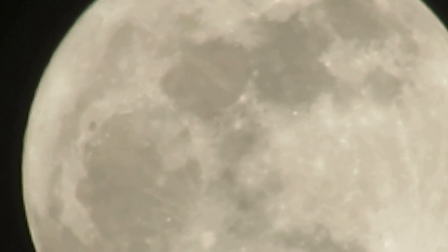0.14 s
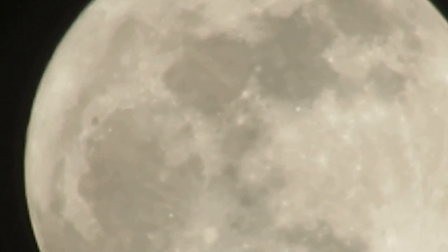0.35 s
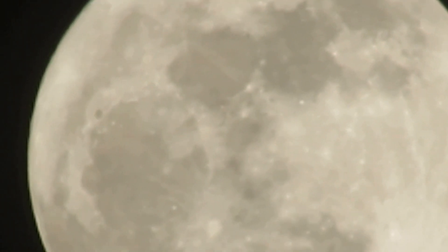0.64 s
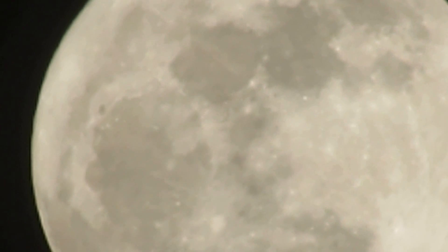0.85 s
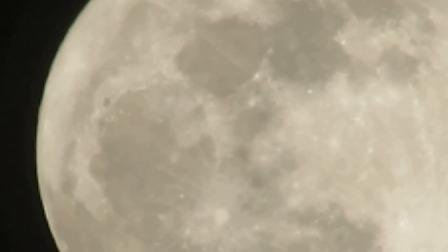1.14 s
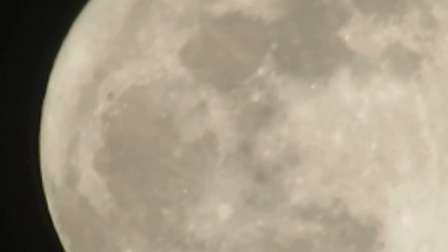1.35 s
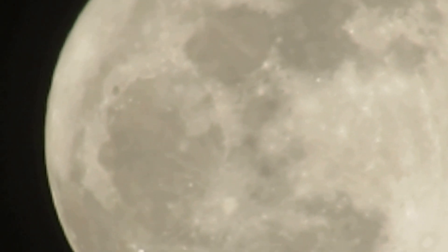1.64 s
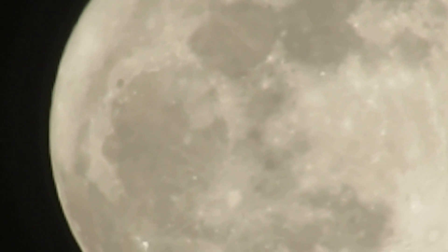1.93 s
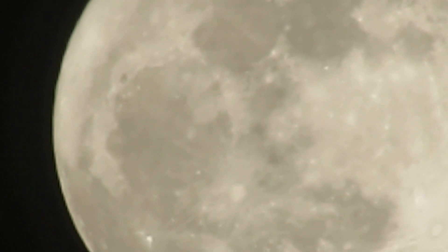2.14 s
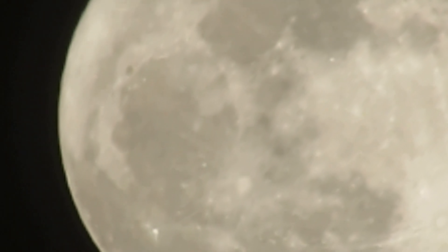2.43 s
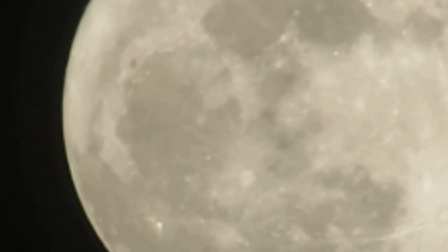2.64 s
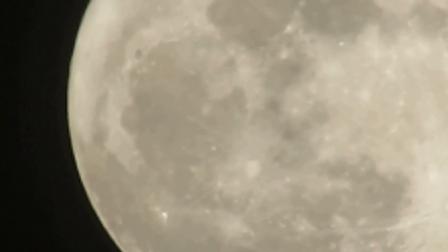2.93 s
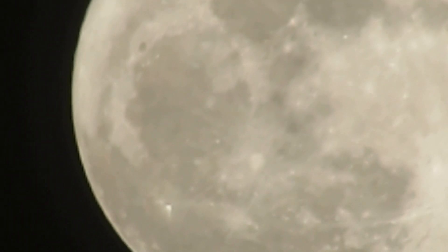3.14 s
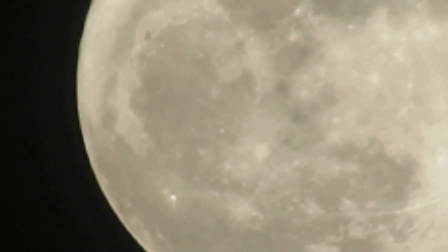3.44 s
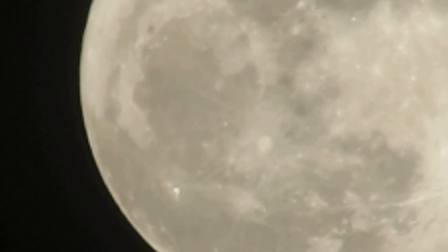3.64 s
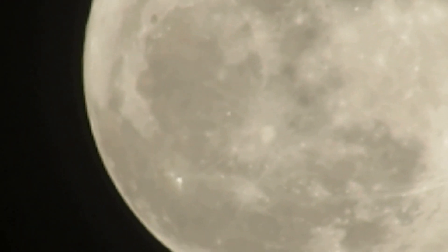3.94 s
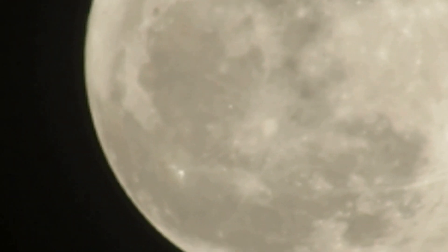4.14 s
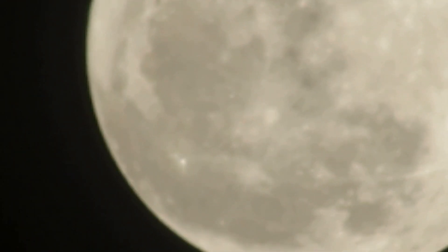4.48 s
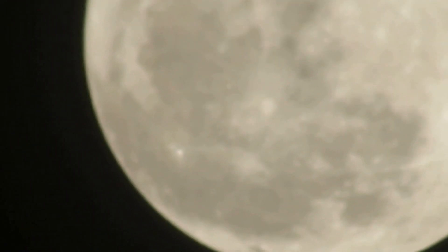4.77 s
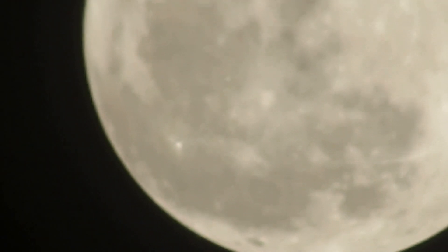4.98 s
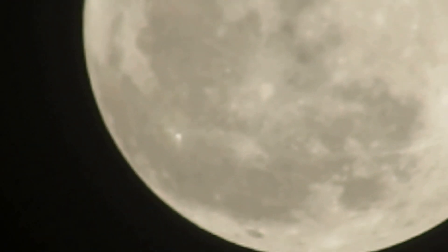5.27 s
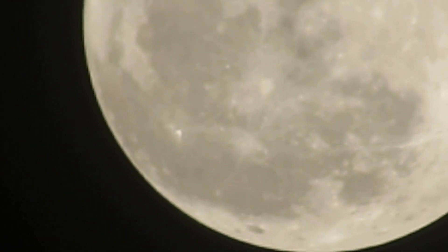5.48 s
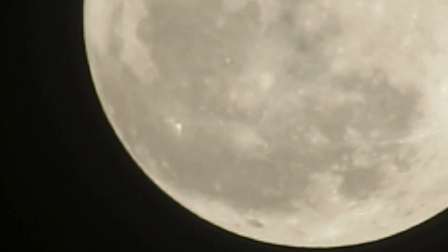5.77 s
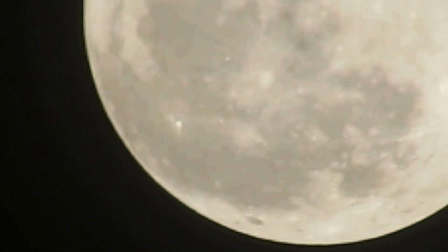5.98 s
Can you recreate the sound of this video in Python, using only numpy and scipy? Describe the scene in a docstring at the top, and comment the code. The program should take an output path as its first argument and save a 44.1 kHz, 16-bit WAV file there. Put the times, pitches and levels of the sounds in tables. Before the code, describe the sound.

Someone watches a full moon from an echoing yard while insects sing throughout. High, fast cricket chirps lead, over a steady purring trill much lower in pitch and a thin chorus of distant crickets. Low road rumble swells slightly now and then beneath airy hiss. A few leaf-like ticks are scattered around, and one quick, dull double knock is heard close to the stereo microphones, past the middle.

```python
"""Night insects in a walled yard

A cricket chirps about eight times a second, three falling wing strokes a chirp, blurred by close echoes, over a
far chorus of noise. A second insect trills on short falling pulses an octave and a half lower, coloured by standing
waves that differ at each microphone. Far traffic rumbles in shaped noise with brief hums, the air hisses, and
a few small ticks (filtered noise bursts) and one dull double knock (decaying modes) fall nearby."""
import sys
import numpy as np
from scipy import signal
from scipy.fft import rfft, irfft, next_fast_len
from scipy.io import wavfile
from scipy.ndimage import map_coordinates

SR = 44100
rng = np.random.default_rng(int(sys.argv[2]) if len(sys.argv) > 2 else 0)


def pcm_store(signal):
    """Save signal as 16-bit PCM."""
    levels = np.round(np.clip(np.atleast_2d(signal), -1, 1) * 32767)
    wavfile.write(sys.argv[1], SR, levels.astype(np.int16).T)


def ratio_of_db(decibels):
    """Turn decibels (scalar or array-like) into linear amplitude factors; 0 dB maps to 1."""
    return 10 ** (np.asarray(decibels, float) / 20)


N = 269451


def unit(x):
    """Scaled to rms 1."""
    return x / np.sqrt(np.mean(x ** 2) + 1e-20)


def along(points, hz):
    """(Hz, value) points read on a log frequency axis."""
    point_hz, value = np.transpose(points)
    return np.interp(np.log(hz + 1), np.log(point_hz + 1), value)


def wobble(rate_hz):
    """A smooth random curve through rate_hz normal draws a second."""
    knots = rng.standard_normal(int(N * rate_hz / SR) + 4)
    return map_coordinates(knots, [np.arange(N) * rate_hz / SR])


def filtered(x, response):
    """x times a complex response of frequency."""
    m = next_fast_len(N + SR)
    return irfft(rfft(x, m) * response(np.fft.rfftfreq(m, 1 / SR)), m)[..., :N]


def rush(spectrum):
    """Stereo noise of rms 1: mid and side are balanced to give the yard's left-right likeness."""
    # likeness of the two microphones: hz, correlation (-1 to 1)
    likeness = [(30, -0.45), (60, -0.12), (130, -0.014), (290, -0.37), (640, -0.56), (1410, -0.32),
                (3100, -0.038), (6820, -0.083), (15000, 0.019)]

    def mid_and_side(hz):
        angle = np.arccos(np.clip(along(likeness, hz), -1, 1)) / 2
        return ratio_of_db(along(spectrum, hz)) * [np.cos(angle), np.sin(angle)]

    mid, side = filtered(rng.standard_normal((2, N)), mid_and_side)
    return unit(np.array([mid + side, mid - side]))


def tail(t60_s, length_s):
    """Diffuse answer of the yard: decaying noise, one per microphone, energy 1."""
    t = np.arange(int(length_s * SR)) / SR
    decay = rng.standard_normal((2, len(t))) * ratio_of_db(-60 * t / t60_s)
    return decay / np.linalg.norm(decay, axis=1, keepdims=True)


def echoes(reflections, loss_db_per_ms):
    """Impulse response of single reflections, each losing more the later it arrives."""
    ms, db = np.transpose(reflections)
    at = np.round(ms * SR / 1000).astype(int)
    return np.bincount(at, ratio_of_db(db - loss_db_per_ms * ms), 5000)[:5000]


def ringing(peaks, hz):
    """Response whose power is a sum of resonance peaks; scattered paths delay each pitch differently."""
    power = sum(ratio_of_db(db) ** 2 / (1 + (2 * (hz - centre) / width) ** 2) for centre, width, db in peaks)
    # folding the cepstrum gives the minimum phase that goes with this power
    cepstrum = irfft(np.log(power) / 2)
    half = len(cepstrum) // 2
    cepstrum[1:half] *= 2
    cepstrum[half + 1:] = 0
    scatter = map_coordinates(rng.standard_normal(SR), [hz / 28])  # a new draw every 28 Hz
    return np.exp(rfft(cepstrum) + 2.2j * scatter)


def triller():
    """Short falling pulses at a steady rate, each starting at a new phase, through the yard's standing waves."""
    # standing waves stirred at each microphone: centre_hz, width_hz, level_db
    yard_left = [(2097, 14, -2), (2140, 30, -7), (2202, 25, -5), (2259, 6, -5), (2290, 10, -3),
                 (2343, 18, 5), (2404, 4, -1), (2431, 7, -4), (2471, 14, -5), (2530, 8, -6), (2561, 25, -4),
                 (2607, 12, -1), (2685, 14, -8)]
    yard_right = [(2110, 30, -4), (2155, 16, -4), (2207, 25, -3), (2250, 14, -4), (2298, 10, -3),
                  (2321, 7, 4), (2357, 4, 3), (2384, 17, 1), (2468, 6, -1), (2515, 16, -4), (2567, 16, -6),
                  (2609, 10, -2), (2686, 25, -6)]
    rate_hz, fundamental_db, octave_db = 123.8, -42.5, -72
    waver_db = 0.13 * wobble(3.03)
    u = np.linspace(0, 1, int(.0075 * SR))
    pulse = np.sin(np.pi * u) * np.exp(2j * np.pi * np.cumsum(2700 - 500 * u) / SR)
    lead = SR  # the trill is already under way for a second when we start to listen
    count = int((N + lead) / SR * rate_hz)
    late, strength = rng.standard_normal((count, 2)).T
    starts = np.exp(2j * np.pi * rng.random(count)) * ratio_of_db(1.5 * strength)
    times = np.arange(count) / rate_hz + .0004 * late
    at = np.clip((times * SR).astype(int), 0, N + lead - 1)
    train, octave_train = np.zeros((2, N + lead), complex)
    train[at] = starts
    octave_train[at] = starts ** 2  # squaring doubles the phase

    song = signal.fftconvolve(train, pulse)[:N + lead].real
    even = 2 * (len(song) // 2)
    hz = np.fft.rfftfreq(even, 1 / SR)
    spectrum = rfft(song[:even])
    heard = [unit(irfft(spectrum * ringing(yard, hz))[-N:]) for yard in (yard_left, yard_right)]
    octave = signal.fftconvolve(octave_train, pulse ** 2).real
    octave = signal.fftconvolve(octave[None], tail(1.0, .48), axes=1)[:, lead:lead + N]
    return ratio_of_db(waver_db) * (ratio_of_db(fundamental_db) * np.array(heard) + ratio_of_db(octave_db) * unit(octave))


def chorus():
    """Far crickets of the same kind, merged into a band of noise that wavers in level."""
    # colour of the far crickets: hz, density_db (per Hz)
    band = [(5400, -120), (5700, -15.5), (6100, -20), (6400, -3.5), (6800, -10), (7100, -1.5),
            (7400, -12.5), (7700, -25), (8200, -120)]
    return ratio_of_db(-56.5 + 0.76 * wobble(5.1)) * rush(band)


def traffic():
    """Broad road rumble in shaped noise; now and then a low gliding hum swells in it and fades."""
    # slow course of the rumble, before a 3.5 dB lift: time_s, level_db
    course = [(0, -48), (2.4, -47.5), (6.11, -47)]
    # colour of the rumble: hz, density_db (per Hz)
    rumble = [(12, -27), (20, -19), (53, -4.5), (82, -4), (146, -3), (187, -6), (245, -7), (471, -16),
              (629, -17.5), (1560, -26), (2000, -30), (2600, -53), (4400, -120)]
    # low hums: start_s, end_s, start_hz, end_hz, level_db (peak, before the lean to the left)
    hums = [(.95, 1.45, 144, 152, -52), (1.95, 2.5, 143, 153, -48), (2.4, 2.65, 105, 105, -51),
            (2.55, 2.95, 131, 134, -52), (4.28, 4.65, 146, 144, -50), (4.25, 4.65, 82, 86, -51),
            (4.6, 5.3, 126, 130, -50), (5.08, 5.85, 149, 154, -52), (5.6, 5.92, 131, 133, -48)]
    t = np.arange(N) / SR
    course_s, course_db = np.transpose(course)
    out = ratio_of_db(np.interp(t, course_s, course_db) + 3.5) * rush(rumble)
    for start_s, end_s, start_hz, end_hz, db in hums:
        u = np.clip((t - start_s) / (end_s - start_s), 0, 1)
        pitch_hz = start_hz + (end_hz - start_hz) * u + 1.5 * wobble(6)
        swell = np.sin(np.pi * u) ** .5
        out += ratio_of_db(db) * swell * np.sin(2 * np.pi * np.cumsum(pitch_hz) / SR)
    return out * ratio_of_db([[.6], [-.6]])  # a little stronger at the left microphone


def hiss():
    """Steady air hiss: shaped stereo noise."""
    # colour of the hiss: hz, density_db (per Hz)
    air = [(1000, -120), (1500, -10), (2000, 4.5), (3000, -0.5), (5500, -4), (8000, -8.5), (12000, -11.5),
           (14500, -11), (15700, -29), (20000, -27)]
    return ratio_of_db(-59.0) * rush(air)


def chirper():
    """Each wing stroke is a tone that sags as the wing slows, with a weak octave, heard through close echoes."""
    # wing strokes of a chirp: lead_s (before its loudest moment), stroke_db, start_hz, fall_hz, octave_db
    # (stroke_db sets the tone and octave_db the octave, before the echoes)
    strokes = [(.0456, -9, 6755, 950, -7), (.0286, -2.3, 6908, 960, 0), (.0118, 1.2, 6962, 750, -2)]
    # early echoes at each microphone: delay_ms, level_db
    echo_left = [(.14, -5), (4.15, -5), (7.96, -9), (9.27, -7), (11.5, -3), (13.72, -2), (17.44, -7),
                 (20.82, -8), (34.72, -6), (42.99, -5)]
    echo_right = [(.59, 0), (4.76, -1), (7.57, 0), (9.34, -2), (11.56, -1), (15.96, -2), (19.39, -3),
                  (25.5, -2), (33.31, -3), (42.22, -3)]
    # runs of evenly spaced chirps, a short hesitation between runs: first_chirp_s, last_chirp_s
    runs = [(.0156, .1516), (.304, .4397), (.5643, .822), (.9395, 2.267), (2.3996, 2.5346), (2.657, 3.0238),
            (3.1414, 3.3763), (3.5008, 3.6179), (3.7652, 5.5691), (5.7016, 5.9791)]
    pace_s, waver_s = .1205, .001  # usual time from chirp to chirp, and its scatter
    chirp_db, uneven_db = -40.5, 0.5  # level of a chirp before its echoes, and its scatter
    margin_s = .1  # room for strokes that begin before the first sample
    u = np.linspace(0, 1, int(.012 * SR))
    swell, sag = np.sin(np.pi * u ** .8), u ** 1.53
    tone, octave = np.zeros((2, N + SR))
    times = np.concatenate([np.linspace(first, last, 1 + round((last - first) / pace_s))
                            for first, last in runs])
    for time_s in times + waver_s * rng.standard_normal(len(times)):
        db = chirp_db + uneven_db * rng.standard_normal()
        for lead_s, stroke_db, start_hz, fall_hz, octave_db in strokes:
            late, detune, strength = rng.standard_normal(3)
            pitch_hz = (start_hz - fall_hz * sag) * (1 + .0015 * detune)
            phase = 2 * np.pi * np.cumsum(pitch_hz) / SR
            gain = ratio_of_db(db + 1.2 * strength) * swell
            at = round((time_s - lead_s + .0003 * late + margin_s) * SR)
            tone[at:at + len(u)] += ratio_of_db(stroke_db) * gain * np.sin(phase)
            octave[at:at + len(u)] += ratio_of_db(octave_db) * gain * (0.85 + 0.69 * sag) * np.sin(2 * phase)

    def near(loss_db_per_ms):
        return np.array([echoes(table, loss_db_per_ms) for table in (echo_left, echo_right)])

    def through(x, answer):
        return signal.fftconvolve(x[None], answer, axes=1)[:, :N + SR]

    # later echoes merge into a diffuse tail from 17 ms on
    late_echoes = np.pad(ratio_of_db(-1) * tail(0.82, .085), ((0, 0), (round(0.017 * SR), 5000)))[:, :5000]
    sound = through(tone, near(0) + late_echoes)
    sound += ratio_of_db(-18.5) * through(octave, near(1.0))
    sound += ratio_of_db(-26.5) * through(octave, tail(.2, .48))
    return sound[:, round(margin_s * SR):][:, :N]


def ticks():
    """Small dry snaps, part ringing twig and part dull leaf rustle; the yard's short answer outweighs the snap."""
    # ticks: start_s, level_db (before a 13.5 dB lift and filtering), left_right_db, twig_to_rustle_db
    tick_list = [(.2175, -59, 1.5, 5), (.7777, -54, 3, 3), (1.169, -47, -6, -10.5), (1.8714, -56, 3, 5),
                 (1.9572, -59, 0, -2), (2.8515, -52, 6, 14.5), (2.9033, -54, 5, 8.5), (4.7322, -62, 0, 5),
                 (5.184, -55, -3, 8)]
    # what a tick rings with: centre_hz, width_hz, level_db
    twig_peaks = [(3300, 700, -8), (4650, 300, 1.5), (8000, 1500, -14)]
    twig, leaf = np.zeros((2, 2, N + SR))
    t = np.arange(400) / SR
    for start_s, db, pan_db, rustle_db in tick_list:
        snap = rng.standard_normal(len(t)) * ratio_of_db(-60 * t / .0015)
        answer = ratio_of_db(10.5) * signal.fftconvolve(snap[None], tail(0.36, 0.33), axes=1)
        answer[:, :len(t)] += snap
        answer *= ratio_of_db(db + 13.5 + np.array([[.5], [-.5]]) * pan_db)
        span = slice(round(start_s * SR), round(start_s * SR) + answer.shape[1])
        twig[:, span] += answer * ratio_of_db(-rustle_db)
        leaf[:, span] += answer * ratio_of_db(rustle_db - 4)

    def wood(f):
        """Band-pass resonances of alternating sign."""
        return sum((-1) ** k * ratio_of_db(db) * 1j * f * width / (centre ** 2 - f * f + 1j * f * width)
                   for k, (centre, width, db) in enumerate(twig_peaks))

    def dry_leaf(f):
        """A broad band around 2 kHz, softened above 9 kHz."""
        band = 1j * f * 5000 / (2000 ** 2 - f * f + 1j * f * 5000)
        return band ** 2 / (1 + 1j * f / 9000)

    return filtered(twig[:, :N], wood) + filtered(leaf[:, :N], dry_leaf)


def knock():
    """A dull double knock on something that holds the microphones: decaying modes, partly opposite in the two."""
    # blows: start_s, level_db
    blows = [(3.988, -30), (3.9983, -33)]
    # modes of the knocked body: pitch_hz, level_db, t60_s, left_right_phase_rad
    body = [(480, 0, .03, 1.9), (605, 1, .025, 1.2), (582, -27, 1.2, .5), (960, -7, .025, 2.6),
            (1260, -7, .025, .5), (1470, -3, .025, .8), (1630, -9, .025, 2.8)]
    out, t = np.zeros((2, N + SR)), np.arange(SR // 4) / SR
    onset = 1 - np.exp(-t / 0.00039)
    for start_s, blow_db in blows:
        at = round(start_s * SR)
        for hz, db, t60_s, lean in body:
            # modes of nearly opposite phase also start a quarter turn back
            phase = np.array([[.5], [-.5]]) * lean - np.pi / 2 * (lean > 2)
            ring = np.sin(2 * np.pi * hz * t + phase)
            out[:, at:at + len(t)] += ratio_of_db(blow_db + db - 60 * t / t60_s) * onset * ring
    return out[:, :N]


def scene():
    """The insects over traffic and hiss, with the small contacts."""
    return triller() + chorus() + traffic() + hiss() + chirper() + ticks() + knock()


def roll_off(x):
    """The treble ends steeply here."""
    return signal.sosfilt(signal.butter(12, 15660, fs=SR, output="sos"), x)


def record(dry):
    """The two microphones' finished mix, as the camera keeps it."""
    return roll_off(dry)


dry = scene()
out = record(dry)
pcm_store(out)
```